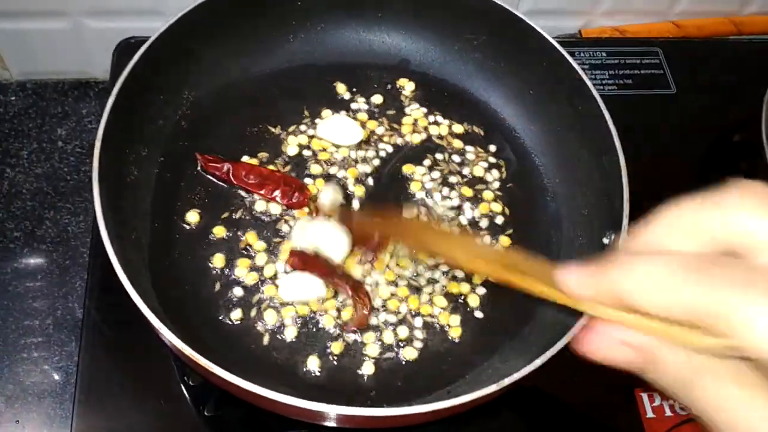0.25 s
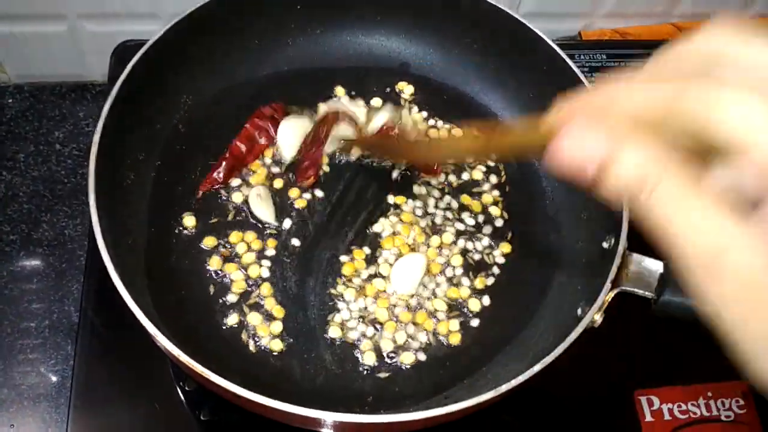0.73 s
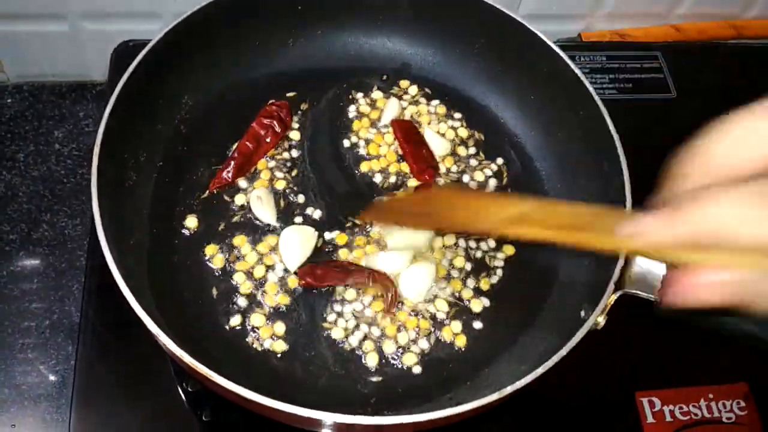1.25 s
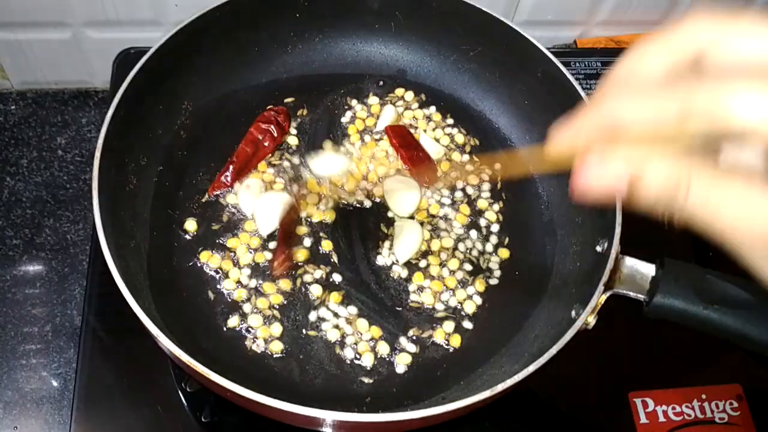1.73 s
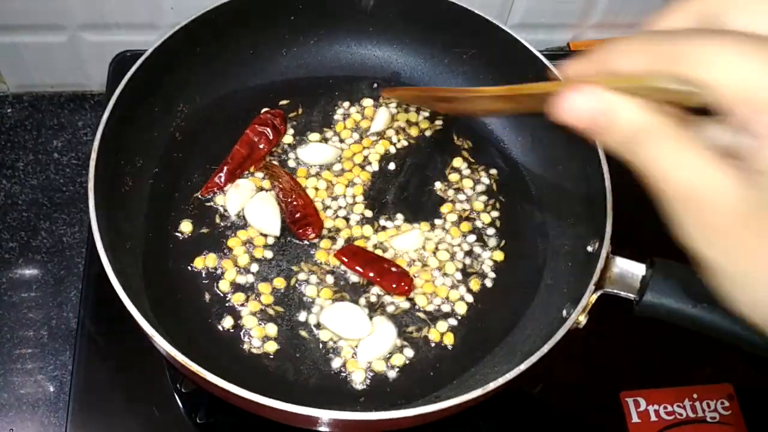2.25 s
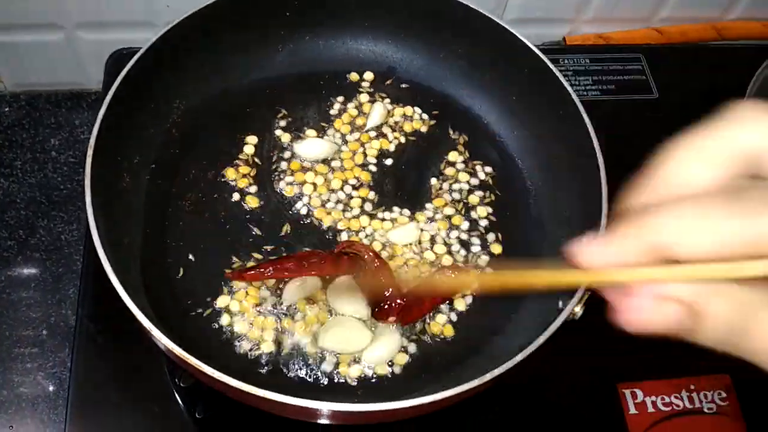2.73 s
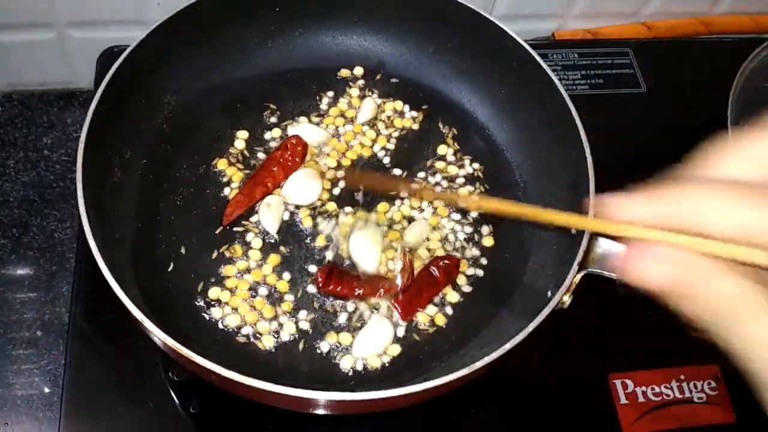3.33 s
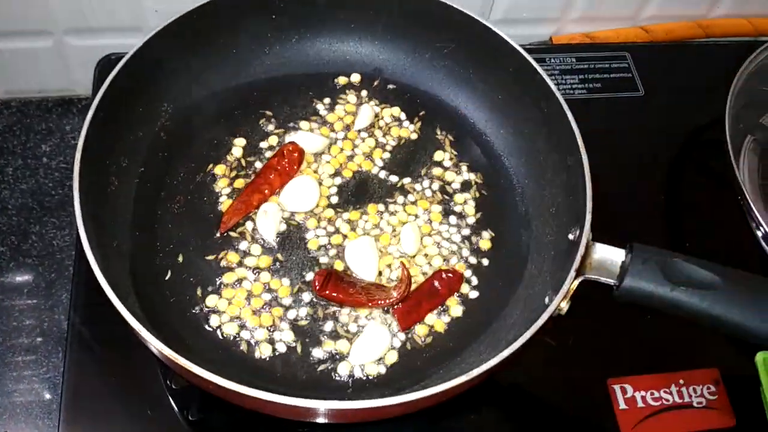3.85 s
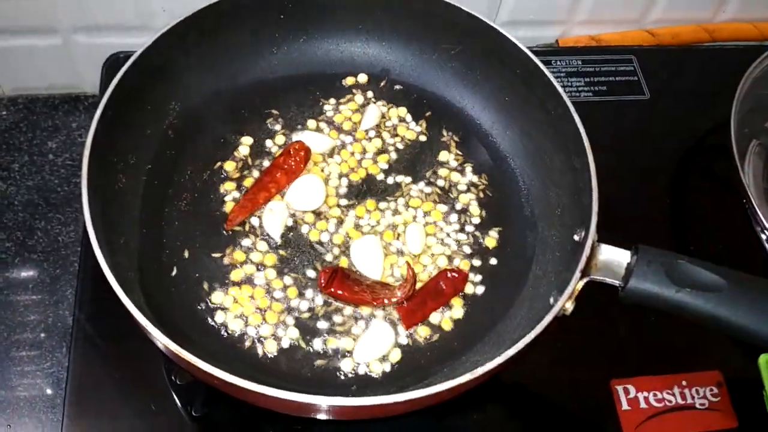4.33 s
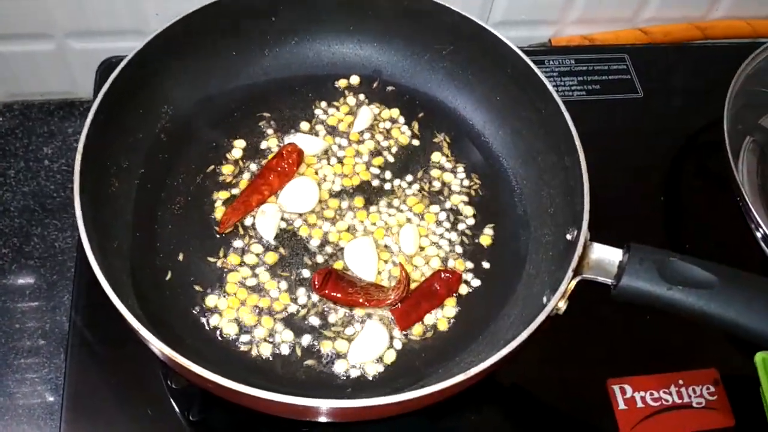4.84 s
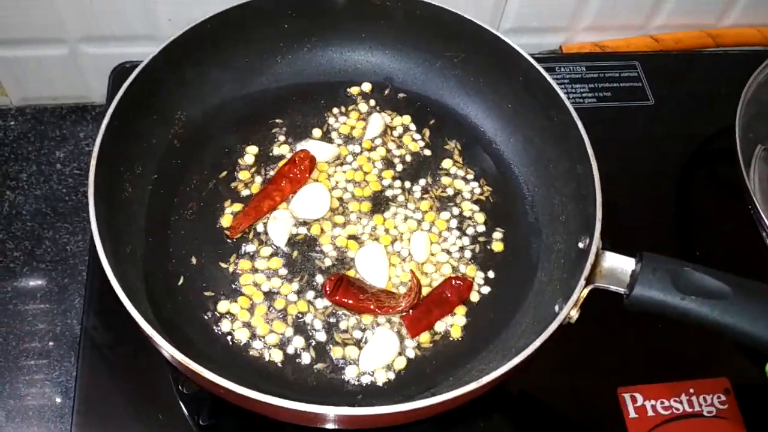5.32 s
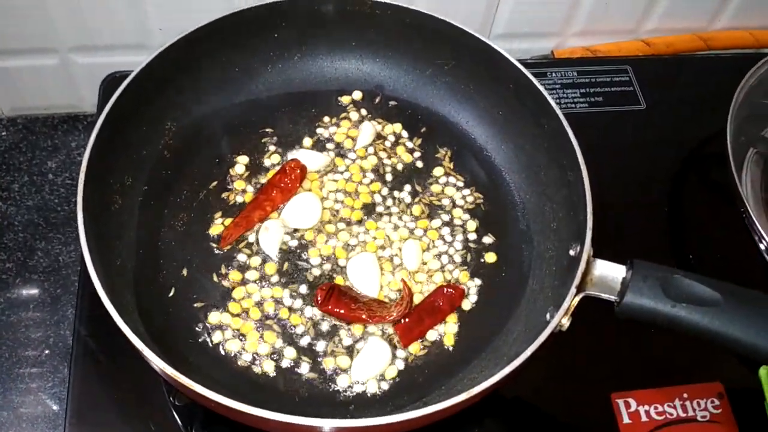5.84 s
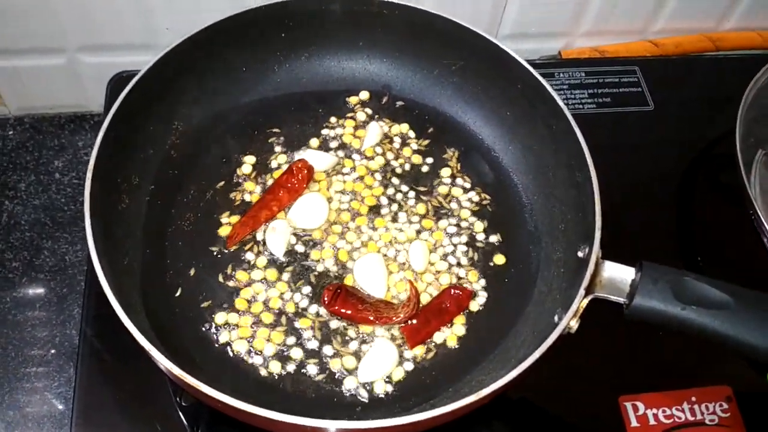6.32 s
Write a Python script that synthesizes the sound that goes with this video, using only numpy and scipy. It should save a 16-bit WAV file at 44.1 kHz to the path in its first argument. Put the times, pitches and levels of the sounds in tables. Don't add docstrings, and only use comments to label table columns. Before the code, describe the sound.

Close up, seeds and spices fry in shallow oil with a thin, bright sizzle. A wooden spatula taps and scrapes the pan; within a second the oil flares into a dense, loud burst of sharp ticks and spits. After about one and a half seconds it drops to gentle fizzing with scattered pops and a few wood knocks. Faint kitchen hush behind; stereo camera microphone close above the pan.

```python
import sys
import numpy as np
from scipy import signal
from scipy.fft import rfft, irfft
from scipy.io import wavfile
from scipy.ndimage import uniform_filter1d, minimum_filter1d, map_coordinates

SR = 44100
rng = np.random.default_rng(int(sys.argv[2]) if len(sys.argv) > 2 else 0)


def put_to_file(sound):
    columns = np.atleast_2d(sound).T
    safe = np.clip(columns, -1, 1)
    whole_steps = np.round(safe * 32767)
    wavfile.write(sys.argv[1], SR, whole_steps.astype(np.int16))


def amplitude_ratio(level_db):
    exponent = np.asarray(level_db, float) / 20
    return 10 ** exponent


N = 290178

# time in seconds, level in dB.
RUMBLE = [(0, -71.5), (.5, -80), (1, -59), (1.3, -73), (3.3, -97), (3.7, -65), (5.3, -60), (5.53, -58),
          (5.8, -83), (6.58, -60)]
# time in seconds, pitch in Hz, level in dB.
WHINE = [(3.45, 660, -110), (3.7, 662, -76), (4.4, 668, -75), (4.7, 680, -79), (4.9, 685, -110)]
# frequency in Hz, level in dB per Hz.
HUSH_SPECTRUM = [(12, -40), (20, 12.5), (54, -11.5), (102, 1), (150, -4), (253, -1.5), (297, -2),
                 (389, -4.5), (751, -13), (1260, -13), (2180, -64.5), (4500, -15.5), (5850, -42),
                 (9900, -120)]
# frequency in Hz, t60 in seconds.
WALL_DECAY = [(200, 0.18), (2000, 0.34), (8000, 0.18), (16000, 0.0032)]
# time in seconds, peak in dB, left-right in dB, t60 in seconds.
PUFFS = [
    (0.96, -44, -24, 0.036),
    (1.632, -33.5, -27, 0.075),
    (2.038, -49, -28, 0.14),
    (2.261, -32, -29.5, 0.13),
    (2.36, -38.5, -16, 0.037),
    (4.747, -34, 34, 0.0091),
    (5, -43, -15, 0.059),
]
# time in seconds, peak in dB, pitch in Hz, t60 in seconds.
KNOCKS = [(0.231, -44, 820, 0.051), (0.621, -38.5, 302, 0.11), (0.643, -38, 314, 0.088),
          (2.942, -38.5, 307.5, 0.2), (2.974, -41, 308, 0.09), (3.3, -41.5, 682, 0.11),
          (3.344, -42.5, 613, 0.046), (3.98, -38, 361, 0.1), (4, -36.5, 360, 0.063),
          (4.188, -32.5, 1058, 0.13), (4.21, -37, 450, 0.054), (4.867, -45.5, 920, 0.074),
          (3.989, -38.5, 117, 0.16), (4.201, -40, 112, 0.1)]
# peak in seconds, length in seconds, level in dB, centre in Hz.
STROKES = [(0.373, 0.086, -54, 796), (0.743, 0.19, -50.5, 845), (0.81, 0.047, -48, 1000),
           (0.973, 0.022, -28, 1480), (1.241, 0.19, -35.5, 2490), (1.422, 0.079, -45.5, 1290),
           (1.778, 0.52, -46, 1970), (2.282, 0.065, -44, 1500), (2.437, 0.025, -37.5, 1470),
           (2.837, 0.15, -46, 2044), (3.081, 0.062, -41.5, 2420), (3.157, 0.04, -39.5, 2390),
           (3.326, 0.049, -48, 890), (3.988, 0.034, -32.5, 1730), (4.2, 0.042, -31.5, 2060),
           (4.542, 0.03, -46.5, 2480), (4.867, 0.096, -58, 925), (5.294, 0.073, -54.5, 1430),
           (5.746, 0.042, -47.5, 1710)]
# frequency in Hz, level in dB.
RASP_SPECTRUM = [(150, -69), (300, -30), (550, -17.5), (900, -6.5), (2500, -6), (3300, -0.5), (5000, -50)]
# fizz in dB, rasp in dB.
RASP_LAW = [(-55.5, -81), (-35.5, -60.5), (13, -57)]
# time in seconds, fizz level in dB.
HEAT = [(0, -42.5), (.1, -49.5), (.6, -52), (.82, -40), (.942, -39), (.953, -25.5), (1.102, -26.5),
        (1.114, -21), (1.74, -23.5), (1.87, -20.5), (2.44, -21.5), (2.51, -31), (2.58, -37), (3.15, -37.5),
        (4.67, -40), (6.2, -44.5), (6.51, -44.5), (6.58, -49)]
# fizz in dB, spit in dB.
SPIT_LAW = [(-52, -66), (-43, -50), (-22, -29)]
# peak in seconds, length in seconds, fizz in dB, spit in dB.
FLARES = [(0, 0.005, -33.5, -54), (0.068, 0.046, -39, -45), (0.303, 0.21, -47, -48.5),
          (0.435, 0.1, -41.5, -50.5), (0.728, 0.83, -41, -43.5), (1.052, 0.068, -34, -28),
          (1.254, 0.15, -39, -25.5), (2.844, 0.047, -25.5, -55), (3.153, 0.14, -47, -32),
          (3.425, 0.25, -56, -36.5), (4.766, 0.16, -45, -43.5), (5.706, 0.14, -58, -39.5),
          (5.888, 0.048, -49, -38.5), (6.095, 0.089, -37, -40)]
# frequency in Hz, level in dB per Hz.
FIZZ_SPECTRUM = [(1200, -72.5), (4120, -44.5), (7000, -10), (7590, -9.5), (9270, -6), (11200, -3.5),
                 (11800, -0.5), (14600, -4), (15400, -4.5), (16200, -16.5)]
# frequency in Hz, level in dB per Hz.
SPIT_SPECTRUM = [(600, -72.5), (1530, -31.5), (2600, -11), (3250, -6.5), (4880, -3.5), (5770, 1), (6770, 0),
                 (8500, -9.5), (11000, -29.5), (18700, -120)]
# time in seconds, peak in dB, pitch in Hz, left-right in dB, t60 in seconds.
SPLUTTERS = [(2.5084, -27.5, 6800, -6.5, 0.016), (2.8398, -27.5, 7750, -0.5, 0.027),
             (3.161, -25.5, 7330, 0.5, 0.05), (3.414, -39.5, 5720, -12, 0.017),
             (3.7143, -25, 8040, -3, 0.015), (4.245, -39, 6400, -25, 0.023),
             (4.3424, -44.5, 5030, -21, 0.036), (4.648, -38, 3850, -12.5, 0.074),
             (4.727, -32, 3720, -5.5, 0.12), (5.105, -32.5, 6300, -9.5, 0.0083),
             (5.2505, -35, 6100, 3, 0.023), (5.376, -33, 7200, -10, 0.016), (5.556, -38, 6700, -20, 0.011),
             (5.637, -46.5, 6140, -18, 0.053), (5.716, -22.5, 3820, -6.5, 0.014),
             (5.873, -50, 5300, -4, 0.0096), (6.0875, -42, 5520, -13, 0.026),
             (6.1457, -30, 5670, 2, 0.0089), (6.4547, -44, 5650, -13, 0.024)]
# time in seconds, peak in dB, pitch in Hz, left-right in dB.
CRACKLES = [(0.3001, -37.5, 7100, -14), (0.4388, -27, 6160, -10), (0.4531, -26, 8400, 4),
            (0.5499, -37, 7300, 13), (0.6097, -38, 7440, -19), (0.6861, -32, 6200, -16),
            (0.7291, -29, 8400, -5), (0.7454, -22, 8400, -14), (0.8288, -18.5, 5850, -11),
            (0.8588, -12.5, 7140, 0.5), (0.8882, -17, 7650, -2), (0.8961, -16, 6500, -6),
            (2.4715, -11.5, 6600, -7), (2.5012, -21, 7100, -14), (2.8466, -29, 6430, 10),
            (2.8539, -24, 8160, -9), (2.8611, -25, 9150, -8), (2.8706, -28, 7880, -4),
            (3.0135, -24.5, 5620, -9), (3.1534, -22, 8900, -17), (3.2286, -26, 5350, -16),
            (3.4184, -22, 5160, -16), (3.4352, -26, 5700, -22), (3.4415, -13.5, 5660, -3),
            (3.6748, -31, 6600, -15), (4.2636, -32, 8900, -20), (4.3524, -31, 5900, -17),
            (4.5428, -23.5, 5420, -15), (4.574, -28, 5950, -11), (4.6624, -39, 7140, -4),
            (4.7412, -33, 7600, -8), (4.747, -30, 6900, -7), (5.0067, -41, 4020, -2),
            (5.0338, -34, 7300, -27), (5.0454, -21, 7150, -4), (5.1118, -29.5, 8700, -18),
            (5.2505, -23.5, 9400, -22), (5.5563, -25.5, 5460, -4), (5.5613, -23, 6700, -3.5),
            (5.6381, -30, 7400, -3), (5.6484, -26.5, 6500, -14), (5.8714, -21, 5360, -14.5),
            (5.8864, -21, 6700, 0), (5.915, -28, 6200, -17), (5.9208, -27, 7000, -6),
            (5.9447, -29, 6700, -7), (6.1462, -33.5, 8500, -31), (6.2571, -23, 8500, 7),
            (6.404, -29, 6360, -4), (6.455, -19, 5600, -12)]
# peak in seconds, peak in dB, pitch in Hz, left-right in dB.
CLICKS = [(1.0603, -15, 3960, -4), (1.0722, -21, 3070, -3), (1.1611, -21, 4070, 0), (1.2658, -16, 3280, -4),
          (1.3481, -26, 3230, -14), (1.4032, -29, 2640, -13.5), (1.631, -33, 860, -5),
          (1.6922, -29, 3930, -14), (1.8233, -32, 1350, -3), (2.0427, -44, 2720, -2),
          (2.0494, -33, 3980, 11), (2.0566, -26, 3330, 1), (2.2621, -34, 1740, 10),
          (2.2864, -33.5, 3380, -20), (2.2969, -34, 2670, -17), (2.4366, -30.5, 1520, -7),
          (2.62, -26, 3210, -2), (2.8035, -39, 1960, -15.5), (2.9936, -36.5, 2550, -14),
          (3.1766, -33, 2840, -19), (3.3261, -44, 1460, -22), (3.4185, -35, 3660, -11),
          (3.7166, -29.5, 3950, -13), (3.7904, -27, 3800, -12), (3.9886, -38, 2440, 5),
          (3.9947, -33.5, 2570, -17), (4.0008, -33, 1290, 6), (4.0071, -33.5, 1250, 8),
          (4.078, -37.5, 1330, -9), (4.2022, -29, 1240, -11), (4.2137, -32, 2360, 11),
          (4.5511, -34, 2740, -2.5), (4.6505, -50, 3750, -6), (4.7412, -38, 1800, 2),
          (5.2503, -34, 3830, 6), (5.7165, -42, 4000, -10), (5.7493, -37, 3060, -5),
          (6.2569, -44, 1310, -3), (6.4932, -40, 3640, -15)]
# time in seconds, peak in dB, pitch in Hz, left-right in dB,
# t60 in seconds.
TAPS = [(.006, -37.5, 1230, -1, 0.017), (0.233, -39.5, 1090, -8, 0.019), (.332, -38.5, 890, -12, 0.0079),
        (0.354, -38.5, 920, -4, 0.012), (.419, -38, 910, -9, 0.0083), (.828, -21, 1350, 10, 0.0048),
        (0.97, -17.5, 1560, 6, 0.011), (1.305, -21, 1470, -3, 0.0029), (1.462, -24, 1190, -13, 0.0041),
        (2.6, -22, 1470, -2, 0.001), (3.1142, -31, 1900, -21.5, 0.012), (3.302, -33.5, 750, -22.5, 0.0054),
        (3.568, -35.5, 900, 14, 0.0021), (3.635, -35.5, 1000, -11, 0.002), (3.983, -28, 2440, 8, 0.041),
        (4.183, -20.5, 2420, 4, 0.024), (4.195, -19.5, 2400, 10, 0.009), (4.996, -25, 1830, -15, 0.0017),
        (5.885, -17, 920, -11, 0.0016), (6.144, -28.5, 1540, -3, 0.0041)]
# peak in seconds, peak in dB, left-right in dB.
POPS = [(0.0577, -36.5, -20.5), (0.8294, -20, -5.5), (1.6318, -18, 3), (1.6663, -27.5, -12),
        (1.9329, -26, -9), (2.0434, -23, 1), (2.2628, -22.5, -6), (2.3606, -26.5, 9), (2.3633, -32, 12),
        (2.8433, -33, -11.5), (4.726, -30, -10), (4.7474, -19.5, 11.5), (4.7991, -30, -3),
        (4.9651, -34.5, -14), (5.0072, -27, 14.5), (5.9388, -35, -19.5), (3.0727, -31, -12),
        (3.1615, -24, -13.5)]
# time in seconds, peak in dB, pitch in Hz, left-right in dB,
# t60 in seconds.
JETS = [
    (.05, -31, 14200, 5, .08),
    (2.841, -30, 10500, -8, .07),
    (6.499, -22, 14300, 12, .26),
    (6.503, -27, 11600, 12, .12),
]
# peak in seconds, peak in dB, left-right in dB.
FLARE_TICKS = [(0.9414, -20, 2), (0.9527, -9, 2), (0.9697, -10, 0), (1.0457, -14, -4), (1.0613, -9, -8),
               (1.0767, -14, -6), (1.1118, -8, -8), (1.1233, -5, 0), (1.1367, -5, -2), (1.1569, -5, -4),
               (1.2031, -10, -2), (1.2117, -8, -4), (1.2246, -4, -9), (1.2354, -8, -3), (1.2448, -7, -4),
               (1.2905, -6, -3), (1.3174, -8, -6), (1.3368, -4, -5), (1.3777, -7, -8), (1.3946, -8, -5),
               (1.4039, -8, 0), (1.4084, -4, -5), (1.4625, -7, -2), (1.5034, -7, 2), (1.5264, -8, -2),
               (1.5584, -6, -5), (1.577, -9, -4), (1.5902, -8, -9), (1.6044, -7, -3), (1.6078, -9, -7),
               (1.6317, -5, -5), (1.6664, -6, -11), (1.6693, -9, -11), (1.6894, -8, -15),
               (1.6929, -11, -11), (1.7354, -11, -13), (1.7575, -7, -9), (1.7749, -8, -4), (1.7978, -7, -3),
               (1.8556, -7, -10), (1.8721, -5, -5), (1.9052, -8, -3), (1.9155, -8, -7), (1.9986, -5, -2),
               (2.0302, -7, -5), (2.0435, -3, -2), (2.0671, -8, -8), (2.0731, -5, -2), (2.0799, -6, -8),
               (2.1186, -7, -4), (2.2398, -2, -1), (2.2492, -8, -3), (2.2629, -5, -1), (2.2935, -8, -4),
               (2.3204, -8, -9), (2.3607, -7, -3), (2.3634, -9, -5), (2.4349, -8, 0), (2.4569, -11, -1),
               (2.5109, -17, -13)]
# peak in seconds, peak in dB.
GENTLE_TICKS = [(0.0577, -23), (0.0639, -21), (0.1649, -23), (0.1751, -28), (0.4537, -26), (0.642, -27),
                (0.7295, -21), (0.8295, -19), (2.603, -21), (2.8431, -13), (3.2217, -21), (3.8443, -22),
                (4.1894, -23), (4.235, -20), (4.2642, -21), (4.3914, -21), (4.4778, -24), (4.5112, -24),
                (4.544, -24), (4.6636, -22), (4.7297, -23), (4.7418, -20), (4.7477, -21), (4.7992, -20),
                (4.9044, -26), (4.9653, -24), (5.0073, -20), (5.106, -24), (5.1105, -23), (5.2092, -26),
                (5.2511, -19), (5.2904, -24), (5.3033, -25), (5.4789, -25), (5.5411, -23), (5.597, -25),
                (5.6385, -25), (5.7092, -24), (5.7167, -26), (5.7263, -27), (5.9212, -27), (5.9802, -23),
                (6.0274, -27), (6.049, -25), (6.0611, -25), (6.1462, -22), (6.1919, -23), (6.2576, -24),
                (6.3763, -25), (6.3892, -27), (6.3989, -27), (6.4247, -24)]

LAG_SAMPLES = 4.3
LEAD_S = .0004
TICK_HZ, TICK_T60_S, POP_T60_S = 11800, .0048, .004
FLARE_RISE, STROKE_RISE = 0.34, 0.7
EDGE_DB = 18
RESTING_HZ = 1920
TOP_HZ = 15950
SWELL_STEP = 64


def unit(x):
    return x / np.sqrt(np.mean(x ** 2) + 1e-20)


def along(points, hz):
    f, v = np.transpose(points)
    return np.interp(np.log(hz + 1), np.log(f + 1), v)


def curves(rows):
    s, *cols = np.transpose(rows)
    return [np.interp(np.arange(N) / SR, s, c) for c in cols]


def wobble(rate_hz):
    knots = rng.standard_normal(int(N * rate_hz / SR) + 4)
    return map_coordinates(knots, [np.arange(N) * rate_hz / SR])


def sides(pan_db):
    return amplitude_ratio(np.array([pan_db / 2, -pan_db / 2]) + 1.0)


def filtered(x, order, hz, kind="low"):
    return signal.sosfilt(signal.butter(order, hz, kind, fs=SR, output="sos"), x)


def coloured(x, spectrum):
    log_gain = np.log(amplitude_ratio(along(spectrum, np.fft.rfftfreq(4096, 1 / SR))) + 1e-6)
    cepstrum = irfft(log_gain)
    cepstrum[1:2048] *= 2
    cepstrum[2049:] = 0
    response = irfft(np.exp(rfft(cepstrum)))
    return unit(signal.fftconvolve(x, response[None], axes=1)[:, :N])


def grains(s, gain, hz, t60_s, lag, noisy, rise, size):
    hz, t60_s = np.broadcast_to(hz, s.shape), np.broadcast_to(t60_s, s.shape)
    k, out = np.arange(size), []
    noise = rng.standard_normal((len(s), size))
    for side, late in enumerate((lag, 0 * lag)):
        start = s * SR + late
        t = np.clip(k - (start % 1)[:, None], 0, None) / SR
        age = t / t60_s[:, None]
        wave = np.sin(2 * np.pi * hz[:, None] * t) + noisy * noise
        wave *= amplitude_ratio(-60 * age) * (1 - np.exp(-age / rise)) * gain[side][:, None]
        at = start.astype(int)[:, None] + k
        out.append(np.bincount(at.ravel(), wave.ravel(), N + size + 64)[:N])
    return np.array(out)


def bubbles(count, scatter_db, hz, octaves, cycles, clump_db, size):
    u, g = rng.random((count, 2)), rng.standard_normal((count, 4))
    at = (u[:, 0] * (N - 1)).astype(int)
    db = -scatter_db * np.log(1.02 - u[:, 1]) + clump_db * np.tanh(wobble(40))[at]
    pitch_hz = np.clip((hz + np.zeros(N))[at] * 2 ** (octaves * g[:, 0]), 300, 17000)
    life_s = cycles * 2 ** (0.53 * g[:, 3]) / pitch_hz
    lag = np.abs(LAG_SAMPLES + 1.5 * g[:, 2])
    gain = amplitude_ratio(db) * sides(3 * g[:, 1])
    return unit(grains(at / SR, gain, pitch_hz, life_s, lag, noisy=1.0, rise=0.12, size=size))


def swells(s, length_s, db, rise):
    after_s = np.arange(0, N, SWELL_STEP) / SR - s[:, None]
    late = after_s / np.clip(length_s, .005, 1)[:, None]
    return amplitude_ratio(db[:, None] - EDGE_DB * np.maximum(late, -late / rise))


def over(floor_db, rows):
    extra = np.repeat((rows ** 2).sum(axis=0), SWELL_STEP)[:N]
    return 10 * np.log10(amplitude_ratio(floor_db) ** 2 + extra)


def law(points):
    return np.interp(curves(HEAT)[0], *np.transpose(points))


def kitchen():
    a, b = rng.standard_normal((2, N))
    hush = coloured(np.array([a + 0.32 * b, a - 0.35 * b]), HUSH_SPECTRUM)
    low = filtered(hush, 2, [70, 140], "band")
    rumble = amplitude_ratio(curves(RUMBLE)[0] - 7.5 + 6.5 * wobble(4.1)) * unit(low)
    hz, db = curves(WHINE)
    phase = 2 * np.pi * np.cumsum(hz + 5 * wobble(25)) / SR
    whine = amplitude_ratio(db - 2.5 + 4 * wobble(13)) * np.sin(phase)
    return sides(0.17)[:, None] * (amplitude_ratio(-66.5 + 1.8 * wobble(6)) * hush + rumble) + whine


def puffs():
    s, db, pan_db, t60_s = np.transpose(PUFFS)
    push = grains(s, amplitude_ratio(db - 10.5) * sides(pan_db), 60, np.clip(t60_s, .01, .2), 0,
                  noisy=5.9, rise=0.0076, size=6000)
    spike = grains(s, amplitude_ratio(db + 6.5) * sides(0 * s), 650, .0014, 0, noisy=.25, rise=.015, size=100)
    return filtered(push, 2, 300) + spike


def knocks():
    s, db, hz, t60_s = np.transpose(KNOCKS)
    rings = grains(s, amplitude_ratio(db - 2.0) * sides(-1.5 + 0 * s), hz, np.clip(t60_s, .01, .3), 6.3,
                   noisy=0.99, rise=0.014, size=6000)
    return filtered(rings, 2, 1300)


def rasp():
    s, length_s, db, hz = np.transpose(STROKES)
    push = swells(s, length_s, db, STROKE_RISE)
    rasp_db = over(law(RASP_LAW), push)
    shift = np.repeat((hz - RESTING_HZ) @ push ** 2, SWELL_STEP)[:N]
    centre_hz = RESTING_HZ + shift / amplitude_ratio(rasp_db) ** 2
    grating = bubbles(4500, scatter_db=1.8, hz=centre_hz, octaves=.38, cycles=8, clump_db=3, size=300)
    return amplitude_ratio(rasp_db - 3.0) * sides(-2.5)[:, None] * coloured(grating, RASP_SPECTRUM)


def oil():
    s, length_s, fizz_db, spit_db = np.transpose(FLARES)
    fizz_db = over(curves(HEAT)[0], swells(s, length_s, fizz_db, FLARE_RISE))
    spit_db = over(law(SPIT_LAW), swells(s, length_s, spit_db, FLARE_RISE))
    small = bubbles(5000, scatter_db=1.5, hz=10790, octaves=0.299, cycles=9.7, clump_db=1.8, size=160)
    steam = amplitude_ratio(2.5 + 2.2 * wobble(45)) * rng.standard_normal((2, N))
    large = bubbles(5500, scatter_db=1.9, hz=5600, octaves=.35, cycles=14, clump_db=2.5, size=256)
    fizz = amplitude_ratio(fizz_db + 2.0) * sides(-2.6)[:, None] * coloured(small + steam, FIZZ_SPECTRUM)
    return fizz + amplitude_ratio(spit_db - 2.5) * sides(-4.5)[:, None] * coloured(large, SPIT_SPECTRUM)


def splutters():
    s, db, hz, pan_db, t60_s = np.transpose(SPLUTTERS)
    drops = grains(s, amplitude_ratio(db - 4.5) * sides(pan_db), hz, np.clip(t60_s, .01, .15), LAG_SAMPLES,
                   noisy=4.9, rise=0.0091, size=5000)
    return filtered(drops, 3, [3300, 7800], "band")


def sharp_bursts(rows, band_hz, t60_s, gain_db):
    s, db, hz, pan_db = np.transpose(rows)
    burst = grains(s, amplitude_ratio(db + gain_db) * sides(pan_db), hz, t60_s, LAG_SAMPLES,
                   noisy=0.42, rise=0.009, size=400)
    return filtered(burst, 2, band_hz, "band")


def crackles():
    bursts = sharp_bursts(CRACKLES, [3500, 9500], t60_s=.005, gain_db=2.5)
    return bursts + sharp_bursts(CLICKS, [700, 4500], t60_s=.007, gain_db=1.5)


def taps():
    s, db, hz, pan_db, t60_s = np.transpose(TAPS)
    rings = grains(s, amplitude_ratio(db - 1.5) * sides(pan_db), hz, np.clip(t60_s, .002, .06), LAG_SAMPLES,
                   noisy=0.81, rise=0.042, size=2000)
    return filtered(rings, 2 + 1, [500, 6500], "band")


def pops():
    s, db, pan_db = np.transpose(POPS)
    snaps = grains(s - LEAD_S, amplitude_ratio(db - 7.5) * sides(pan_db), 3500, POP_T60_S, LAG_SAMPLES,
                   noisy=4.9, rise=0.0083, size=500)
    return filtered(snaps, 3, [400, 9000], "band")


def jets():
    s, db, hz, pan_db, t60_s = np.transpose(JETS)
    hiss = grains(s, amplitude_ratio(db) * sides(pan_db), hz, t60_s, LAG_SAMPLES, noisy=3.3, rise=.01, size=9000)
    return filtered(filtered(hiss, 3, 12100, "high"), 3, 12100, "high")


def ticks():
    s, db, pan_db = np.transpose(FLARE_TICKS + [row + (-3,) for row in GENTLE_TICKS])
    g = rng.standard_normal((len(s), 2))
    gain = np.minimum(amplitude_ratio(db + 3.0) * sides(pan_db), 1.1)
    hz, t60_s = TICK_HZ * 2 ** (0.083 * g[:, 0]), TICK_T60_S * 2 ** (0.1 * g[:, 1])
    rings = grains(s - LEAD_S, gain, hz, t60_s, LAG_SAMPLES, noisy=0.7, rise=0.03, size=500)
    return filtered(rings, 3, 5900, "high")


def walls(x):
    hz, t, z = signal.stft(rng.standard_normal((2, SR // 3)), SR, nperseg=256)
    decay = amplitude_ratio(-60 * t / along(WALL_DECAY, hz)[:, None])
    tail = signal.istft(z * decay, SR, nperseg=256)[1]
    return signal.fftconvolve(x, tail / np.linalg.norm(tail[0]), axes=1)[:, :N]


def scene():
    pan = ticks() + jets() + pops() + taps() + crackles() + splutters() + knocks() + rasp()
    bed = oil()
    echo = amplitude_ratio(-12) * walls(pan) + amplitude_ratio(-13.5) * walls(bed)
    return pan + bed + echo + puffs() + kitchen()


def limited(x):
    gain = minimum_filter1d(1 / np.maximum(np.abs(x), 1), size=41, axis=1)
    return x * uniform_filter1d(gain, size=41, axis=1)


def thinned(x, margin_db):
    def smooth(y, bins, frames):
        return uniform_filter1d(uniform_filter1d(y, size=bins, axis=0), size=frames, axis=1)

    hz, t, z = signal.stft(x, SR, nperseg=1024)
    power = np.abs(z.sum(axis=0)) ** 2 + 1e-20
    patch = np.log(smooth(power, 6, 2))
    around = smooth(patch, 40, 3)
    spared = (hz < 2900) | (abs(hz - 11800) < 2200)
    kept = (patch > around + 2 * np.log(amplitude_ratio(margin_db))) | spared[:, None]
    kept = minimum_filter1d(minimum_filter1d(kept * 1, size=4, axis=0), size=2, axis=1)
    gain = np.where(kept, 1, amplitude_ratio(-45)) * (hz < TOP_HZ)[:, None]
    return signal.istft(z * gain, SR, nperseg=1024)[1][:, :N]


def top_cut(x):
    return signal.sosfilt(signal.butter(12, 16650, fs=SR, output="sos"), x)


def record(dry):
    mix = thinned(limited(dry), margin_db=-2.35)
    return top_cut(mix)


dry = scene()
out = record(dry)
put_to_file(out)
```